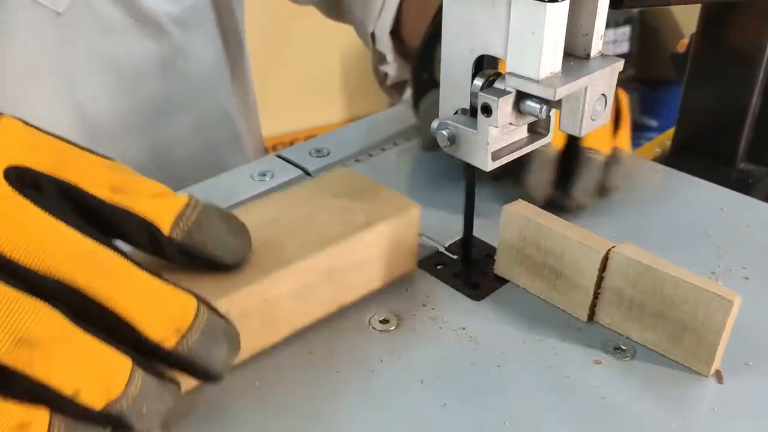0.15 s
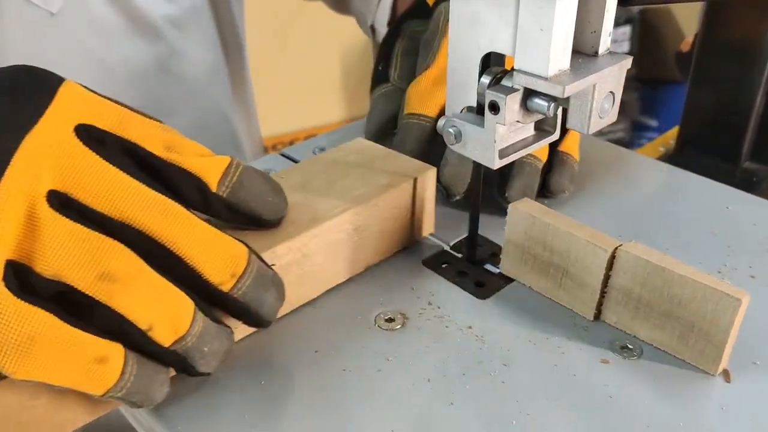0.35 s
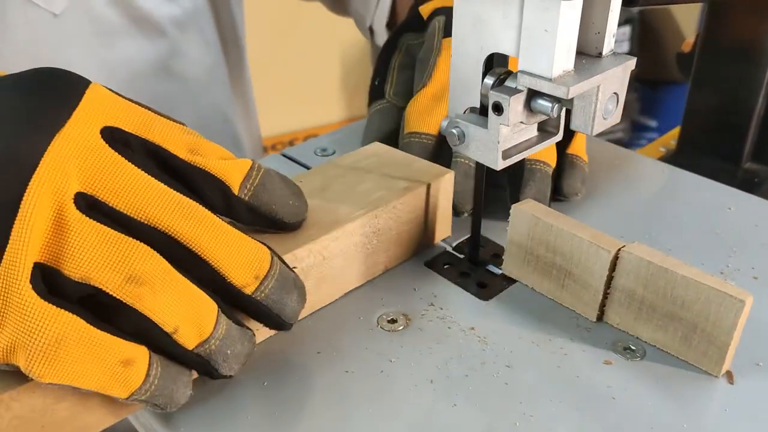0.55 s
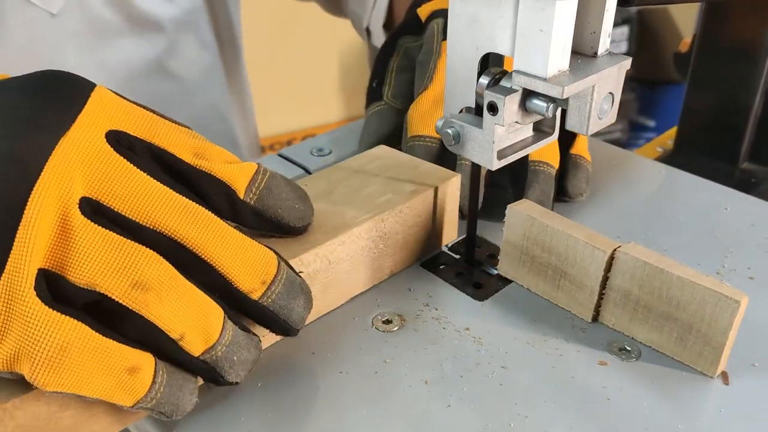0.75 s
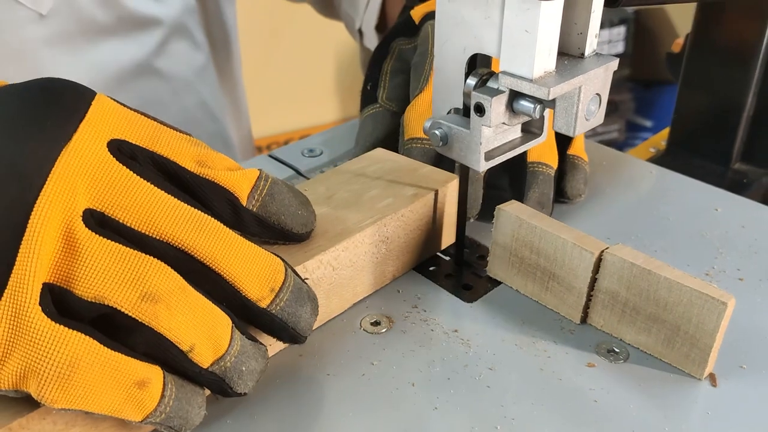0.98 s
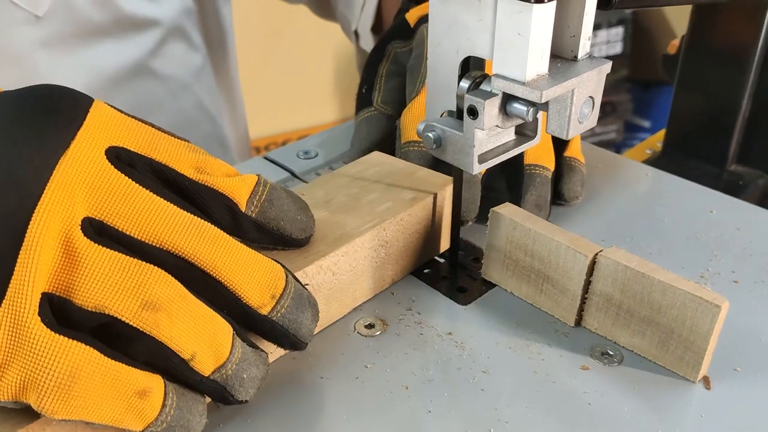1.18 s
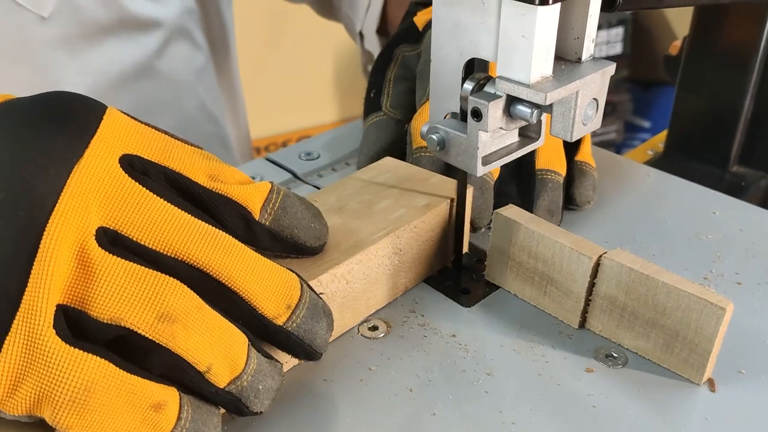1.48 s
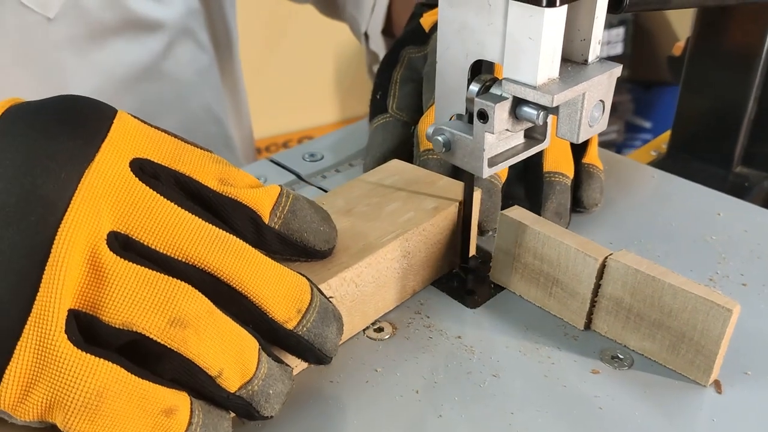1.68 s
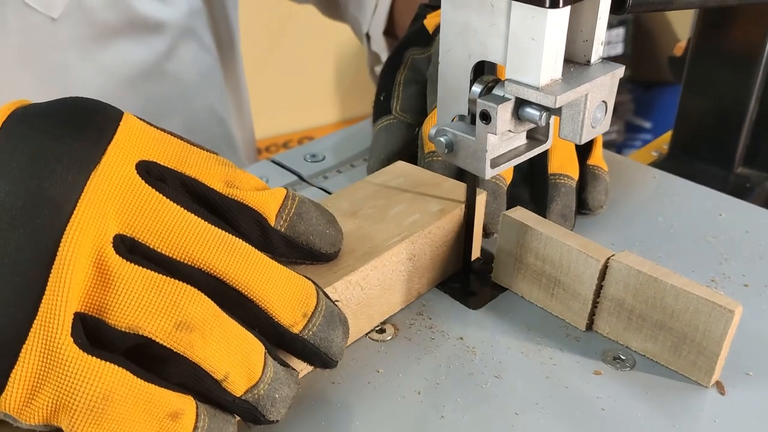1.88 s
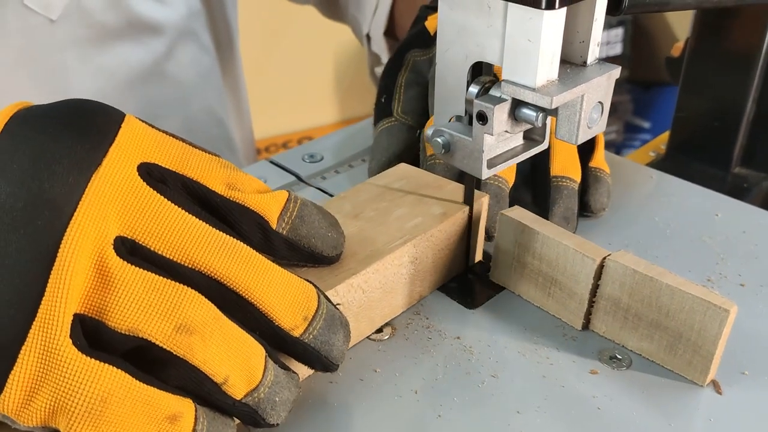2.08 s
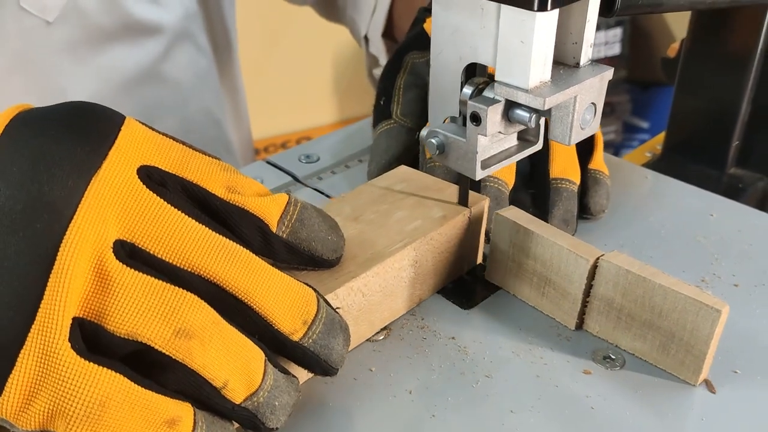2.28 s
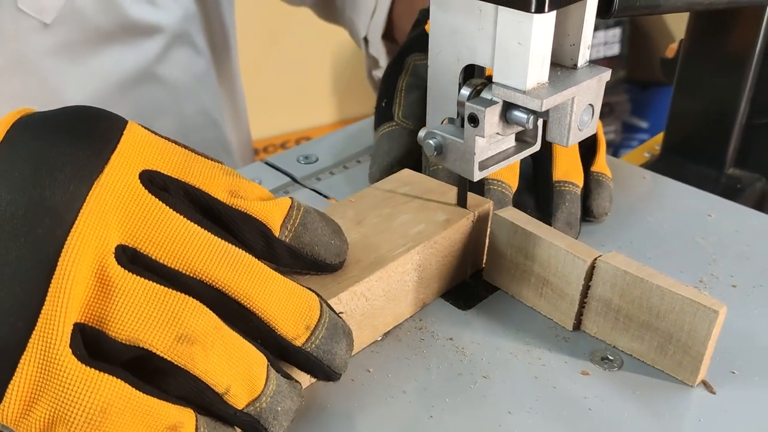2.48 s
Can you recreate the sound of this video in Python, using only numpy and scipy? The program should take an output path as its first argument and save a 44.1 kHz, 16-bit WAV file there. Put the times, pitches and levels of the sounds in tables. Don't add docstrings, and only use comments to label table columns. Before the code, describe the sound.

A benchtop band saw hums and whines, then bites into a wood block with a harsh buzz

```python
import sys
import numpy as np
from scipy import signal
from scipy.fft import rfft, irfft
from scipy.io import wavfile
from scipy.ndimage import uniform_filter1d

SR = 44100
rng = np.random.default_rng(int(sys.argv[2]) if len(sys.argv) > 2 else 0)


def volts_from_db(level):
    exponent = np.asarray(level, float) / 20
    return 10 ** exponent


def unload_audio(sound):
    columns = np.transpose(np.atleast_2d(sound))
    steps = np.round(np.clip(columns, -1, 1) * 32767)
    wavfile.write(sys.argv[1], SR, steps.astype(np.int16))


N = 116865

# t/s, level/dB
FEED_PRESSURE = [
    (1.493, -25),
    (1.503, -9),
    (1.6, -5),
    (1.67, -6),
    (1.7, -3.5),
    (1.9, -2.5),
    (2.05, -0.5),
    (2.3, -1),
    (2.65, -1.55),
]
CUT_START_S = FEED_PRESSURE[0][0]


def evened(x):
    return x / np.sqrt(np.mean(x ** 2) + 1e-20)


def read(points, hz):
    f, value = np.transpose(points)
    return np.interp(np.log(hz + 1), np.log(f + 1), value)


def curve(points):
    s, value = np.transpose(points)
    return np.interp(np.arange(N) / SR, s, value)


def body(x, slope, rings=(), dips=(), size=32768):
    hz = abs(np.fft.fftfreq(size, 1 / SR))
    power = volts_from_db(read(slope, hz)) ** 2
    for f, width, db in rings:
        power = power + volts_from_db(db) ** 2 / (1 + (2 * (hz - f) / width) ** 2) ** 2
    log_gain = np.log(power) / 2
    for f, width, db in dips:
        log_gain = log_gain + np.log(volts_from_db(db)) / (1 + (2 * (hz - f) / width) ** 2)
    spectrum = np.exp(np.conj(signal.hilbert(log_gain)))
    taps = np.fft.ifft(spectrum).real[:size // 2]
    led_in = np.r_[x[:size // 2][::-1], x]
    return evened(signal.fftconvolve(led_in, taps)[size // 2:][:N])


def drift(per_s):
    z = rfft(rng.standard_normal(N))
    return evened(irfft(z / (1 + (np.fft.rfftfreq(N, 1 / SR) / per_s) ** 4), N))


def sine(pitch):
    return np.sqrt(2) * np.sin(2 * np.pi * np.cumsum(pitch) / SR)


def swell(s, half):
    return np.exp(-((np.arange(N) / SR - s) / half) ** 4)


def air():
    # t/s, level/dB
    gusts = [(0.0, -8), (0.37, -20), (0.49, -6.5), (0.6, -13.5), (0.66, -6), (0.8, -7), (0.88, -3),
             (0.9, -10.5), (1.47, -24.5), (1.48, -16.5), (1.85, -20.5), (2.07, -6.5), (2.12, -22),
             (2.19, -6), (2.38, -12), (2.41, -10.5), (2.52, -15.5), (2.65, -10.5)]
    # f/Hz, level/dB per Hz
    rumble_slope = [(3, -5), (8, 0), (22, -6.5), (50, -12.5), (70, -24), (130, -41.5), (300, -87.5),
                    (1500, -130)]
    # f/Hz, level/dB per Hz
    flutter_slope = [(30, -63.5), (70, 2), (120, 0), (200, -7.5), (280, -22), (500, -80.5), (1500, -120)]
    # t/s, peak level/dB, f/Hz
    buffets = [(0.401, -16.5, 62), (0.437, -13, 38.6), (.478, -13, 94), (0.51, -7, 24), (.655, -12.5, 122),
               (0.66, -8.5, 59.6), (.692, -10, 81), (0.715, -3.5, 32), (.742, -12, 102), (0.832, -8, 39),
               (.846, -14, 70), (.856, -13.5, 114), (0.874, -2, 49.3), (.89, -13, 93), (.92, -12.5, 60),
               (1.048, -12.5, 34), (1.211, -21, 60), (2.067, -9, 41), (2.2, -15, 30), (2.321, -15, 64.4),
               (2.41, -8.5, 29), (2.47, -16.5, 75.6)]
    steady_s, onset_s, buffet_cycles = 0.17, 0.04, 0.45
    flutter_db, flutter_growth, flutter_s = -32, 1.68, 0.012
    t = np.arange(N) / SR
    gust_db = curve(gusts)

    rumble = body(rng.standard_normal(N), rumble_slope)
    window = round(steady_s * SR)
    loudness = uniform_filter1d(uniform_filter1d(rumble ** 2, window), window)
    rumble = rumble / np.sqrt(loudness + 0.05)
    out = volts_from_db(gust_db - 5.5) * rumble * np.clip(0.5 + t / onset_s, 0, 1)

    stir = volts_from_db(-43.5 + flutter_growth * (gust_db + 22.5))
    for s, db, hz in buffets:
        cycles = (t - s) * hz
        shape = np.exp(-(np.where(cycles < 0, 1.5, 1) * cycles / buffet_cycles) ** 2)
        out = out + volts_from_db(db) * shape * np.sin(-2 * np.pi * cycles)
        stir = stir + volts_from_db(flutter_growth * db) * (hz / 50) ** 2 * np.exp(-((t - s) / flutter_s) ** 2)
    out = out + volts_from_db(flutter_db) * body(rng.standard_normal(N) * stir, flutter_slope)
    return np.tanh(out)


def room(x):
    t60_s = 0.23
    at = np.arange(300, SR // 2, 20)
    taps = np.zeros(SR // 2 + 20)
    signs = rng.choice([-1., 1.], len(at))
    taps[at + rng.integers(0, 20, len(at))] = signs * volts_from_db(-60 * at / SR / t60_s)
    return signal.fftconvolve(x, taps / np.linalg.norm(taps))[:N]


def machine():
    # f/Hz, level/dB per Hz
    idle_slope = [(120, -18), (300, 4.5), (500, -2.5), (700, 1), (1000, -2.5), (3500, -18.5), (7000, -26.5),
                  (15500, -47.5)]
    # f/Hz, width/Hz, level/dB
    idle_rings = [(314, 110, -3.5), (660, 44, 3), (742, 120, 4), (830, 42, -4), (1697, 220, -4.5),
                  (2530, 200, -12), (3440, 1130, -13.5), (4220, 70, -10), (5500, 150, -14),
                  (9500, 590, -34)]
    # f/Hz, width/Hz, level/dB
    idle_dips = [(4470, 250, -8.5), (2960, 300, -3.5), (953, 145, -4.5)]
    # f/Hz, rms level/dB, wander/Hz, flutter/dB, gain in the cut/dB
    tones = [
        (303.8, -48.5, 2.66, -0.5, 3),
        (369, -52.5, 2, 2.5, 5),
        (738.8, -39.5, 2.4, 2, -4),
        (50.5, -33.5, 0.7, 0.5, 0.5),
        (9900, -86, .6, 3, 4),
    ]
    load_sag = 0.00887
    load = volts_from_db(curve(FEED_PRESSURE)) * (np.arange(N) / SR > CUT_START_S)
    out = volts_from_db(-38.5) * body(rng.standard_normal(N), idle_slope, idle_rings, idle_dips)
    for hz, db, wander_hz, flutter_db, cut_db in tones:
        sagging = hz * (1 - load_sag * load * (hz < 1000))
        pitch = sagging + wander_hz * drift(8.2) * (1 + 2 * load)
        out += volts_from_db(db + flutter_db * drift(27) + cut_db * load) * sine(pitch)
    return out


def guides():
    # centre t/s, half length/s, level/dB
    leans = [(0.08, 0.038, -56), (.36, 0.051, -57.5), (0.448, .03, -60), (.53, 0.031, -58),
             (.665, 0.019, -53.5), (0.756, 0.033, -53), (0.837, .025, -60.5), (1, 0.078, -55),
             (1.108, 0.034, -56.5), (1.26, 0.043, -59), (1.346, 0.026, -50), (1.409, 0.019, -53.5),
             (1.5, .025, -53)]
    # f/Hz, level/dB, half length/s, centre times t/s
    squeaks = [
        (9500, -75, .02, [.345, .66, .725, .86, 1.0, 1.2, 1.285, 1.335]),
        (11660, -83, .06, [.27, .58, .73, 1.03, 1.22, 1.33]),
    ]
    t = np.arange(N) / SR
    pitch = 4966 + 12 * t + 9 * drift(25)
    level = volts_from_db(-64)
    for s, half, db in leans:
        level = level + volts_from_db(db) * swell(s, half)
    out = level * volts_from_db(2.5 * drift(36)) * sine(pitch)
    fuzz = drift(260 / 2)
    for hz, db, half, times in squeaks:
        bursts = sum(swell(s, half) for s in times)
        out += np.sqrt(2) * volts_from_db(db) * bursts * fuzz * np.sin(2 * np.pi * hz * t)
    return out


def drag():
    # f/Hz, level/dB per Hz
    scrape_slope = [(800, -14), (2500, 12), (6000, 2), (15000, -26)]
    peak_s, width_s = 0.052, 0.081
    stroke = np.exp(-0.5 * ((np.arange(N) / SR - peak_s) / width_s) ** 2)
    return volts_from_db(-47.5) * stroke * body(rng.standard_normal(N), scrape_slope)


def hums():
    # centre t/s, half length/s, f/Hz, level/dB
    locked = [(1.59, 0.026, 752, -31), (1.68, 0.058, 740, -37), (1.6, 0.093, 300, -37),
              (1.8, 0.056, 298, -36), (1.88, 0.043, 315, -33), (1.95, 0.045, 293, -31.5),
              (2.05, 0.042, 322, -30), (2.22, 0.038, 322, -34.5), (2.31, .06, 292, -31),
              (2.4, 0.065, 325, -33.5), (2.48, 0.047, 297, -30.5), (2.63, 0.037, 297, -29),
              (1.93, 0.07, 596, -37.5), (2.22, 0.065, 593, -33.5), (2.1, 0.023, 596, -40),
              (2.4, 0.028, 500, -37), (2.5, 0.041, 420, -34), (2.05, .03, 790, -33),
              (2.06, 0.043, 835, -38), (2.15, 0.12, 732, -40.5), (2.33, 0.053, 728, -33.5),
              (2.35, 0.023, 785, -31), (2.54, .03, 780, -40), (1.96, 0.017, 2590, -31),
              (2.2, .04, 2565, -31), (2.315, 0.013, 2590, -29.5), (2.45, 0.023, 2490, -35),
              (4.2, 0.017, 2560, -37), (3.2, .025, 2750, -33), (2.4, 0.023, 2750, -31)]
    wander, flutter_db = 0.006, 2
    sway, flutter = drift(20.8), drift(40)
    out = np.zeros(N)
    for k, (s, half, hz, db) in enumerate(locked):
        shift = k * 3001
        pitch = hz + wander * np.sqrt(hz * 300) * np.roll(sway, shift)
        out += volts_from_db(db + flutter_db * np.roll(flutter, shift)) * swell(s, half) * sine(pitch)
    return out


def proud_teeth():
    # place in the lap/0-1, width/s, level/dB
    proud = [
        (.02, 0.0075, 6.5),
        (.36, 0.0074, 4),
        (.70, 0.0043, 3),
    ]
    lap_s, lap_start_s = 0.1358, 1.503
    lap = (np.arange(N) / SR - lap_start_s) / lap_s
    press_db = np.zeros(N)
    for at, width, db in proud:
        away_s = ((lap - at + 0.5) % 1 - 0.5) * lap_s
        press_db += db * np.exp(-0.5 * (away_s / width) ** 2)
    return press_db


def hard_bites():
    # start t/s, level/dB, length/s
    bites = [(1.503, 10.5, 0.011), (1.552, 6.7, 0.019), (1.6, 4, 0.015), (1.657, 5.1, 0.02),
             (1.684, 7.5, 0.016), (1.728, 6.2, 0.019), (1.762, 6.6, 0.01), (1.814, 9.1, .01),
             (1.862, 8, 0.012), (1.897, 9, 0.015), (1.953, 8, 0.013), (1.963, 12, .012), (1.991, 9, 0.011),
             (2.019, 3.9, 0.0065), (2.03, 8.4, 0.035), (2.077, 10.2, 0.014), (2.094, 6, .015),
             (2.133, 6, 0.01), (2.171, 7.8, .025), (2.22, 7.6, 0.029), (2.271, 8, .015), (2.308, 10, 0.016),
             (2.36, 4.2, 0.0085), (2.379, 7, 0.011), (2.404, 3.8, 0.013), (2.44, 3.1, 0.01),
             (2.471, 4.2, 0.0099), (2.501, 4.6, .01), (2.518, 6, .01), (2.552, 9.4, 0.021),
             (2.627, 4.8, 0.02)]
    rise_s = 0.0025
    t = np.arange(N) / SR
    return sum(db * np.clip((t - s) / rise_s, 0, 1) * np.exp(-((t - s) / length) ** 4) for s, db, length in bites)


def tooth_blows():
    passed = np.floor(np.cumsum(733 * (1 + 0.01 * drift(15))) / SR)
    teeth = np.diff(passed, prepend=0) * volts_from_db(12 * rng.standard_normal(N))
    return evened(teeth - teeth.mean())


def chip_crackle():
    snaps = rng.random(N) < 9000 / SR
    return snaps * rng.standard_normal(N) * volts_from_db(0.5 * rng.exponential(1, N).clip(0, 4))


def blade(force):
    # f/Hz, level/dB per Hz
    blade_slope = [(900, -18.5), (1700, -11), (2100, -15.5), (3000, -13.5), (5000, -18.5), (7400, -22),
                   (12500, -32.5), (15600, -45)]
    # f/Hz, width/Hz, level/dB
    blade_rings = [(1750, 240, -12.5), (3084, 170, -9), (3450, 100, -11), (5010, 155, -8.5),
                   (5580, 220, -12.5), (6960, 410, -21), (10770, 320, -29)]
    # f/Hz, width/Hz, level/dB
    blade_dips = [(2130, 150, -5), (8800, 400, -5)]
    return volts_from_db(-33.5) * body(force, blade_slope, blade_rings, blade_dips)


def free_span(force, press_db):
    # f/Hz, width/Hz, level/dB
    span_rings = [(2206, 72, -15.5), (2300, 70, -14), (2411, 45, -10), (2493, 45, -10), (2565, 34, -5.5),
                  (2744, 72, 1), (2829, 60, -7)]
    steady_s = 0.012
    ring = body(force * volts_from_db(2 * drift(98)), [(20, -52), (20000, -83)], span_rings)
    ring = ring / (uniform_filter1d(ring ** 2, round(steady_s * SR)) + 0.05) ** 0.33
    return volts_from_db(-35) * evened(ring * volts_from_db(press_db))


def block_and_table(force):
    # f/Hz, level/dB per Hz
    block_slope = [(120, -30.5), (200, -8), (400, -6.5), (520, -19), (750, -7.5), (920, -17.5), (1400, -16),
                   (3000, -46)]
    # f/Hz, width/Hz, level/dB
    block_rings = [(182, 22, -17), (287, 21, -3), (329, 24, -2), (400, 10, -9), (416, 13, -1),
                   (514.4, 24, -7), (596, 22, -8.5), (797, 56, -10), (849, 21, -5), (1607, 10, -1)]
    return volts_from_db(-36) * body(force, block_slope, block_rings)


def singing(chips, press_db):
    # start t/s, end t/s, f/Hz, width/Hz, level/dB
    passing = [
        (1.5, 1.95, 10720, 380, -54),
        (2.0, 2.45, 10720, 380, -58),
        (2.42, 2.7, 11450, 250, -60),
        (2.32, 2.9, 5090, 240, -37),
        (2.33, 2.75, 2520, 420, -35),
        (2.46, 2.7, 1710, 220, -35),
        (2.25, 2.7, 12800, 400, -60),
        (1.68, 2.25, 7000, 1400, -46),
        (2.03, 2.35, 800, 140, -39),
    ]
    rise_s, fade_share = 0.004, 0.28
    t = np.arange(N) / SR
    out = np.zeros(N)
    for start, end, hz, width, db in passing:
        rise = 1 / (1 + np.exp((start - t) / rise_s))
        fade = 1 / (1 + np.exp((t - end) / (fade_share * (end - start))))
        shifted = np.roll(chips, round(hz))
        ring = body(shifted, [(20, -70), (20000, -67)], [(hz, width, 0)], size=8192)
        out += volts_from_db(db + 0.35 * press_db) * rise * fade * ring
    return out


def cut():
    feed_db, proud_db, bite_db = curve(FEED_PRESSURE), proud_teeth(), hard_bites()
    teeth, chips = tooth_blows(), chip_crackle()
    force = (0.17 * teeth + evened(chips)) * (np.arange(N) / SR > CUT_START_S)
    late_db = np.roll(proud_db, round(0.029 * SR))
    out = blade(force * volts_from_db(feed_db + 0.18 * (proud_db + bite_db) + drift(27)))
    out += free_span(force, feed_db + 0.61 * proud_db + bite_db)
    out += block_and_table(force * volts_from_db(1.05 * feed_db + 0.75 * late_db))
    return out + singing(chips, proud_db + bite_db)


def scene():
    sawing = cut() + hums()
    tail = volts_from_db(-8) * room(sawing)
    return (air() + tail + machine() + guides() + drag() + sawing)[None]


def low_pass(x):
    return signal.sosfilt(signal.butter(12, 15640, fs=SR, output="sos"), x)


def record(dry):
    return low_pass(dry)


dry = scene()
out = record(dry)
unload_audio(out)
```